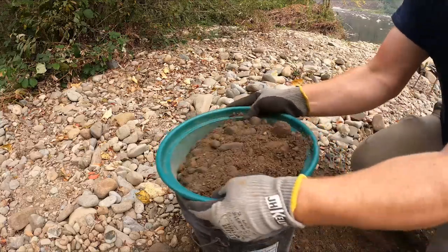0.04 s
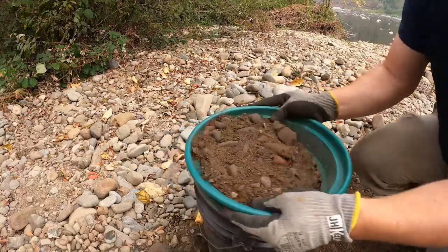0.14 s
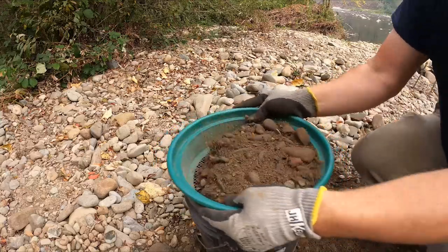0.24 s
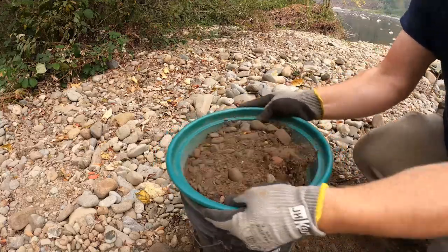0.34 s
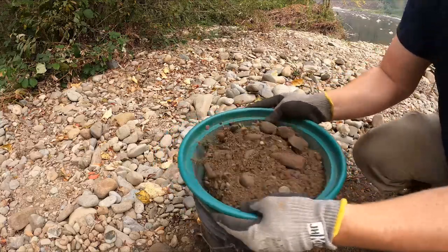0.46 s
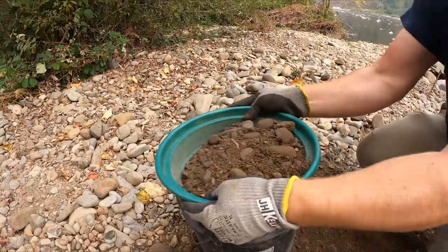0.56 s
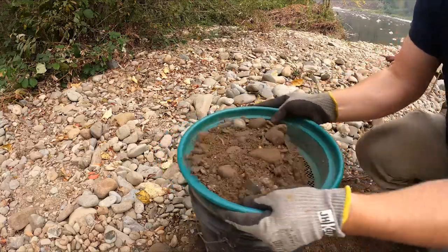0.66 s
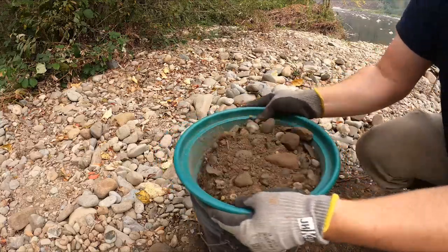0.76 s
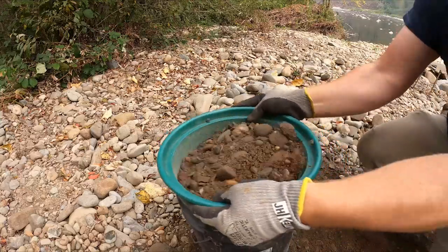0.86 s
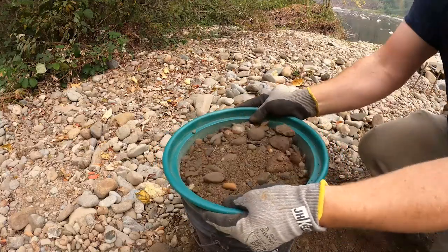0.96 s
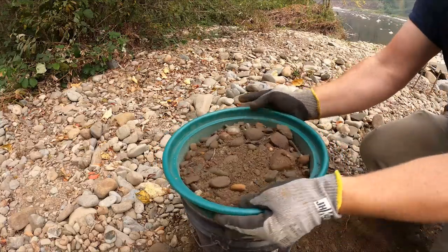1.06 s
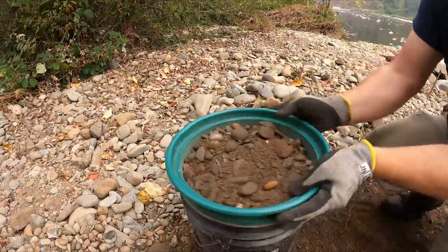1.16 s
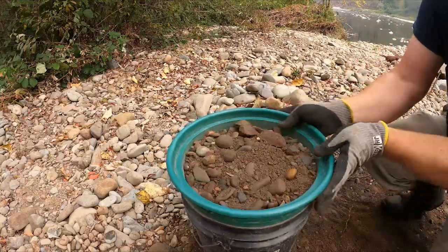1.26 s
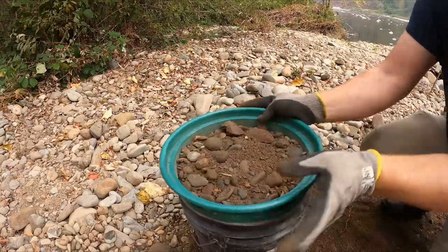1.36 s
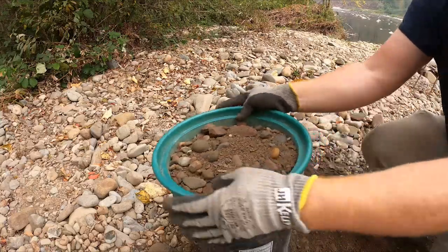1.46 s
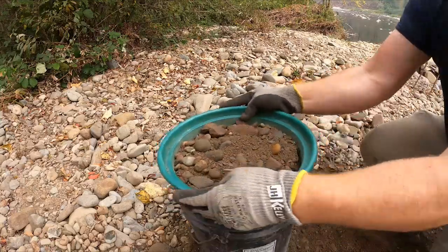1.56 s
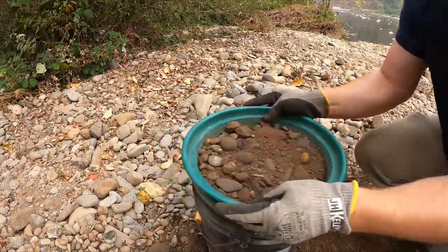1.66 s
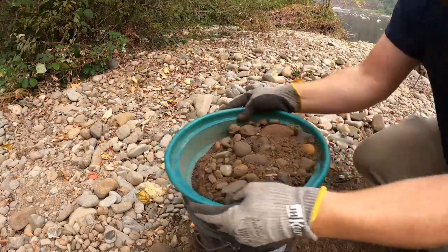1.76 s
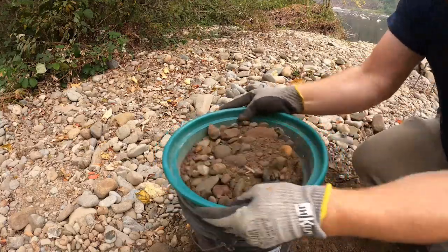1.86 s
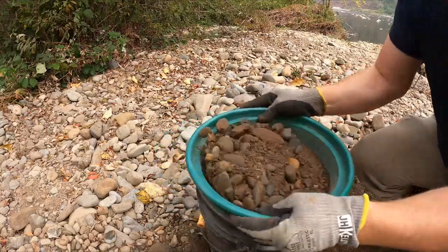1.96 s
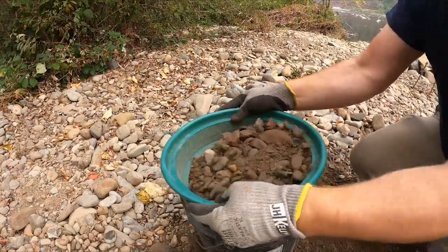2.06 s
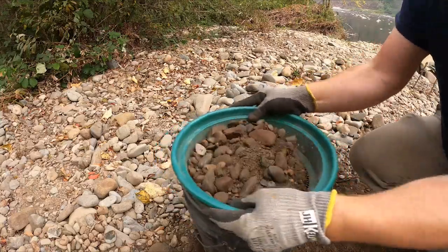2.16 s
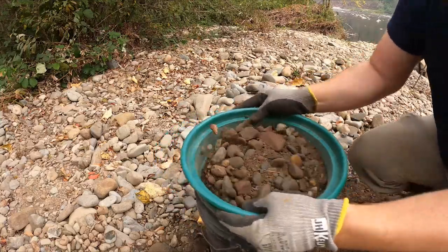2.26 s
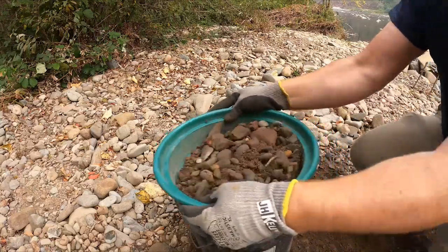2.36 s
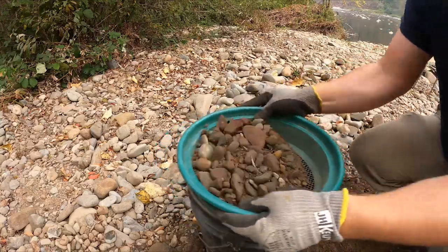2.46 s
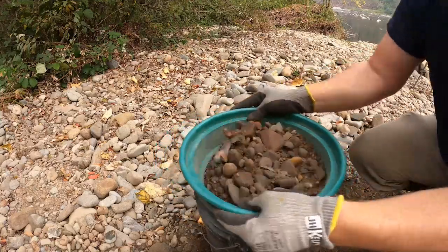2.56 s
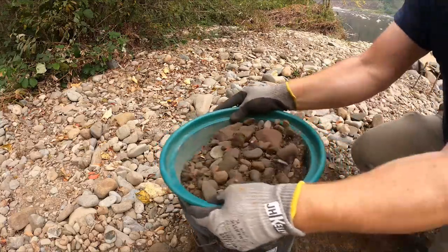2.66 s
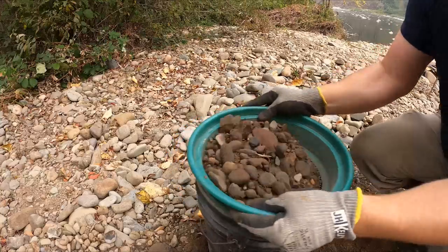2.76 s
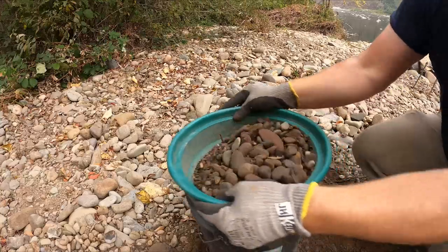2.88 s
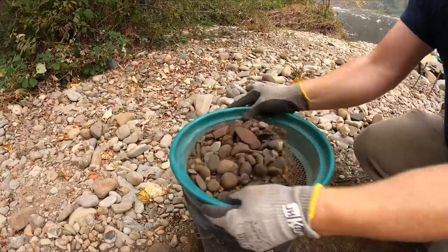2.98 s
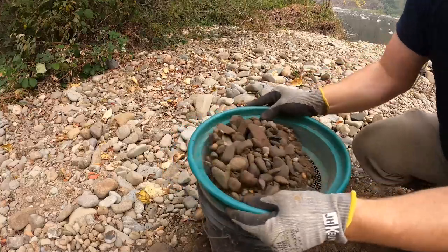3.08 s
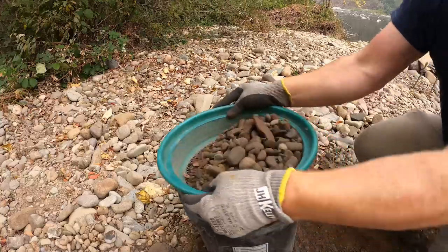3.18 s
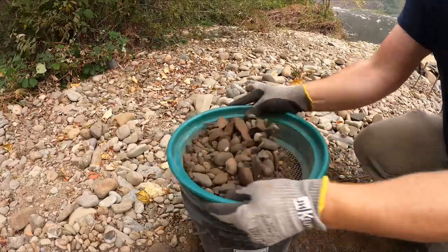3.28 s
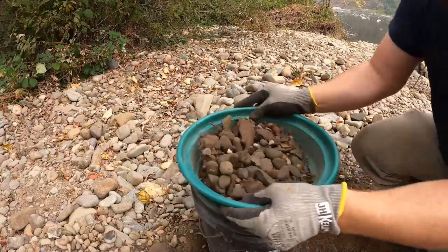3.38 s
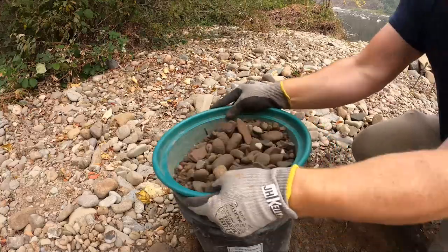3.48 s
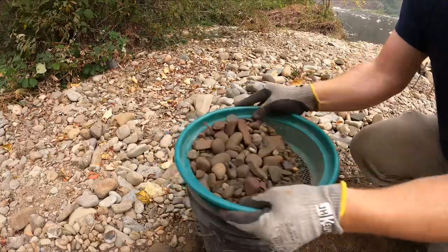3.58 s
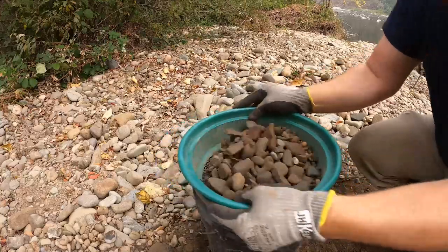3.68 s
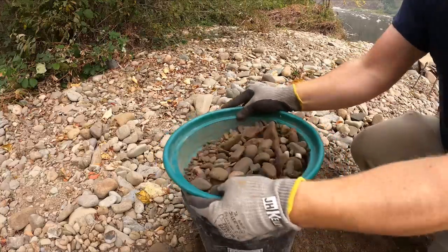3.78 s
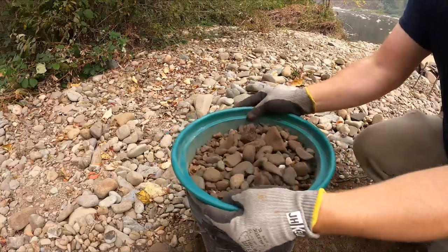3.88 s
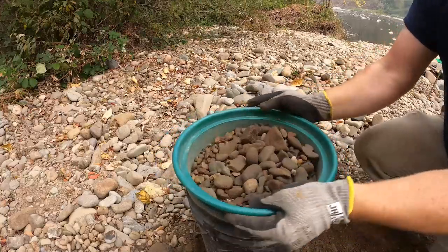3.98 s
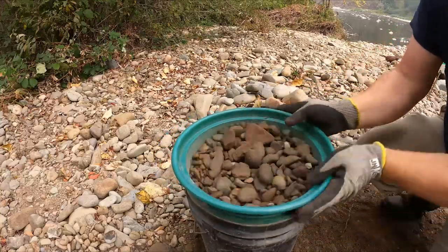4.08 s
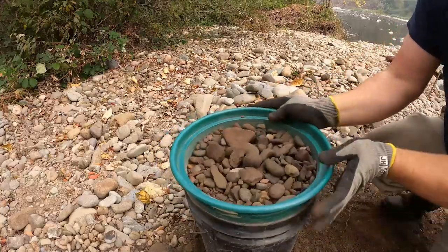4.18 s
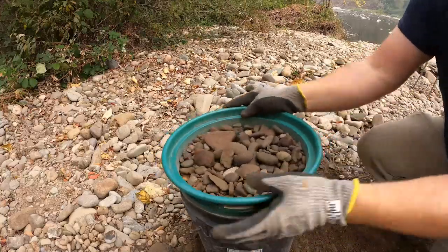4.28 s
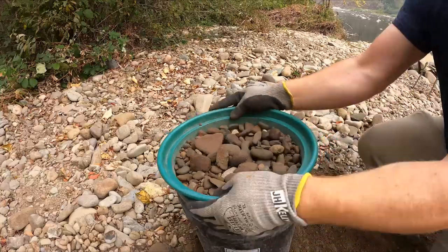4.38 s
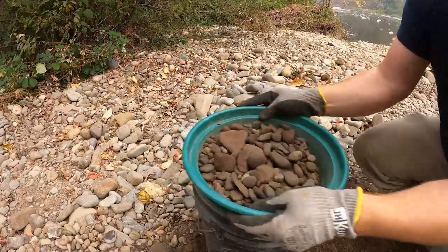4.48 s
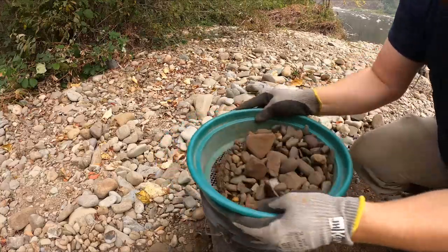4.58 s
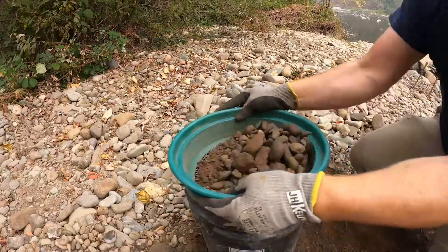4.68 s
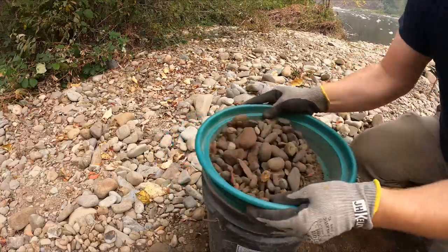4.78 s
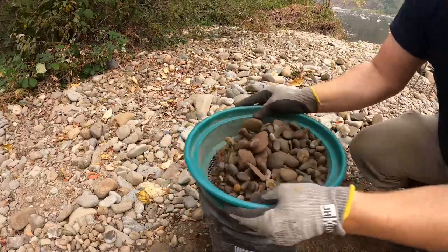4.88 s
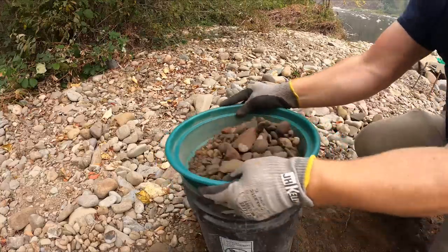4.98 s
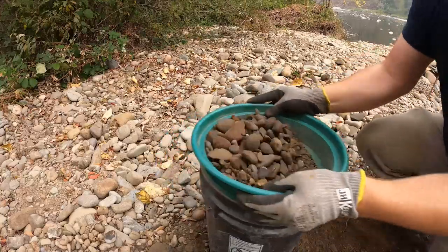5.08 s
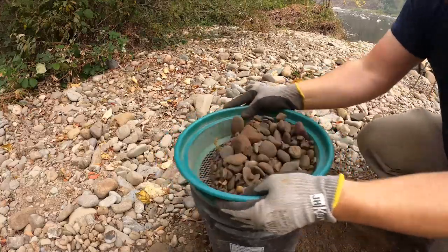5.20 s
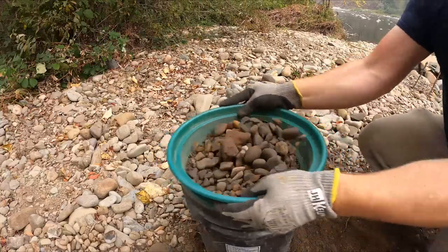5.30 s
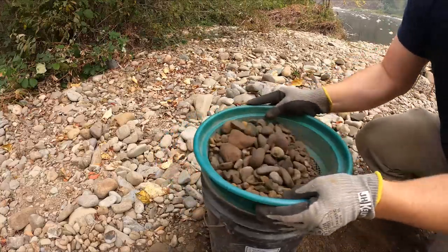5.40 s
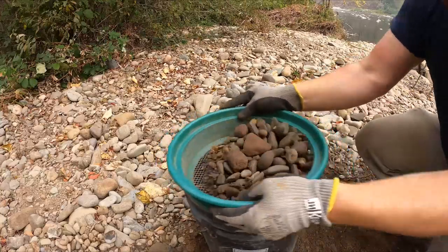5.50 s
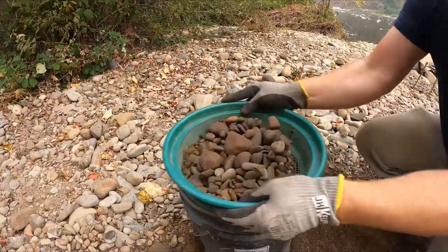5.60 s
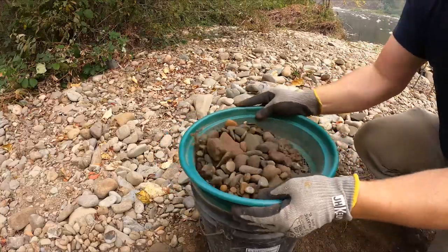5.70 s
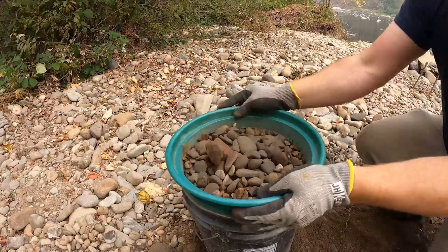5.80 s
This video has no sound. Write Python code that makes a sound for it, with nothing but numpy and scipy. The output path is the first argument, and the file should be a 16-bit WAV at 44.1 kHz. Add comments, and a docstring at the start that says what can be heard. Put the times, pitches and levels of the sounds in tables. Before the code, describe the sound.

Outdoors, close to the microphone, dry gravel is shaken in a plastic mesh sieve over a bucket. Quick to-and-fro strokes, about seven a second, make a dense rattle of pebbles, crackling grit and low bucket thuds. After about a second it stops for a dull gritty scrape as the sieve is turned, then resumes, pauses once more past four seconds, and continues to the end over a faint river wash.

```python
"""Dry river gravel is shaken to and fro in a plastic sieve on a bucket, outdoors and close to the microphone.
Each stroke is many tiny ringing contacts of pebbles and grit, with big pebbles landing and bucket thuds.
After about a second the shaking stops and the sieve is turned: dense dull grains scrape on the sandy rim.
Shaking returns for over two seconds, pauses for a second turn near 4.2 s, then goes on to the end.
Under it all lies filtered noise: a faint, slowly swelling wash of river and open air."""
import sys
import numpy as np
from scipy import signal
from scipy.fft import rfft, irfft
from scipy.io import wavfile

SR = 44100
rng = np.random.default_rng(int(sys.argv[2]) if len(sys.argv) > 2 else 0)


def to_wav(s):
    """Save 16-bit WAV."""
    ch = np.atleast_2d(s).T  # columns
    pcm = np.round(np.clip(ch, -1, 1) * 32767)  # PCM
    wavfile.write(sys.argv[1], SR, pcm.astype(np.int16))


N = 257841
TIME = np.arange(N) / SR

# shakes of the sieve: (time at mid-slide [s], relative level [dB], half the slide length [s],
# grit relative to that level [dB])
STROKES = [(0.08, -25, 0.059, -29), (0.22, -23.5, 0.036, -23), (0.365, -23.5, 0.057, -25.5),
           (0.481, -27, 0.027, -22), (0.613, -22.5, 0.019, -29.5), (0.75, -23, 0.031, -27.5),
           (0.888, -27, 0.027, -25.5), (1.035, -28.5, 0.039, -22.5), (1.748, -30.5, 0.033, -33),
           (1.855, -23.5, 0.042, -31), (2.008, -24.5, 0.056, -20), (2.156, -23.5, 0.044, -29.5),
           (2.268, -22, 0.015, -22.5), (2.414, -24.5, 0.053, -30), (2.539, -22.5, 0.019, -24.5),
           (2.724, -25, 0.055, -26), (2.83, -24.5, 0.024, -19), (2.985, -24, 0.048, -25),
           (3.12, -23.5, 0.028, -19.5), (3.285, -23, 0.056, -21), (3.393, -19.5, 0.022, -32),
           (3.568, -23.5, 0.064, -39), (3.673, -25.5, 0.031, -18), (3.833, -21.5, 0.049, -31),
           (3.969, -34, 0.039, -15), (4.593, -27, 0.037, -25), (4.705, -23.5, 0.033, -27.5),
           (4.889, -26.5, 0.06, -18.5), (5.014, -23, 0.051, -26.5), (5.157, -22, 0.028, -18),
           (5.325, -24, 0.057, -20.5), (5.467, -26, 0.057, -19), (5.618, -25, 0.051, -18),
           (5.75, -23, 0.05, -21)]
# colour of pebbles landing on the mesh: (frequency [Hz], relative level [dB])
PEBBLE = [(30, -52), (200, -9.5), (450, -11.5), (800, -5), (1020, -1.5), (1300, -3), (1560, 2), (2100, -7),
          (3200, -2.5), (5000, -10.5), (7000, -22), (8000, -15), (11000, -32), (16000, -66)]
# colour of stone clicking on stone: (frequency [Hz], relative level [dB])
FLINT = [(30, -93), (700, -37), (1500, -10.5), (2500, -3), (3600, -11.5), (5100, -8), (7000, -16),
         (8000, -36), (11000, -27), (16000, -39)]
# colour of the plastic rim and wall: (frequency [Hz], relative level [dB])
RIM = [(30, -58), (160, -24), (260, -9.5), (520, -2), (750, 0.5), (1000, 0.5), (1600, 4.5), (2400, -5),
       (3600, -14), (5200, -17.5), (7000, -30), (10000, -34), (16000, -69)]


def gravel(pebble_gain, grit_gain):
    """Pebbles knock on the mesh and click on each other, more often the harder they go; grit crackles through."""
    # colour of the grit: (frequency [Hz], relative level [dB])
    grit_colour = [(30, -60), (1500, -9), (3000, -2), (5000, 0), (7000, -8), (8000, -4), (9800, -10),
                   (11000, -18), (13000, -25), (15500, -40)]
    # colour of small hopping chips: (frequency [Hz], relative level [dB])
    chip_colour = [(30, -60), (1500, -30), (5000, 20), (8500, -16), (11000, -22), (15500, -10)]
    busy = np.clip(pebble_gain / undb(-23.0), .3, 1)
    knocks = rattle(PEBBLE, busy, per_s=1200, spread_db=3, ring_hz=1500, ring_db=6, octaves=.55)
    clicks = rattle(FLINT, busy, per_s=1700, spread_db=5, ring_hz=3200, ring_db=8, octaves=.75)
    grit = rattle(grit_colour, busy ** .5, per_s=3200, spread_db=4.5, ring_hz=6000, ring_db=4, octaves=.7)
    # a few small chips keep hopping on their own, between strokes too
    chips = rattle(chip_colour, busy ** .5, per_s=45, spread_db=4, ring_hz=7500, ring_db=5, octaves=.7)
    # stones tumble in clumps, with brief lulls between them
    clumps = undb(1.6 * walk(65))
    click_gain = np.sqrt(pebble_gain * grit_gain)
    stones = undb(1.5) * pebble_gain * knocks + undb(10.5) * click_gain * clicks
    tumbling = clumps * (stones + undb(13) * grit_gain * grit)
    return tumbling + undb(-31.5) * np.sqrt(grit_gain) * chips


def load_motion():
    """Loudness of the pebbles and of the grit: the strokes add up over a faint creep of the load."""
    creep_db, creep_grit_db = -43.5, -82.5  # the load is never quite still
    grit_lead_s = 0.0022  # grit slides before the pebbles
    pebbles, grit = undb(creep_db) ** 2, undb(creep_grit_db) ** 2
    for s, db, half_s, grit_db in STROKES:
        power = undb(db) ** 2 * surge(s, half_s)
        pebbles = pebbles + power
        grit = grit + undb(grit_db) ** 2 * power
    early_grit = np.interp(TIME + grit_lead_s, TIME, grit)
    return np.sqrt(pebbles), np.sqrt(early_grit)


def surge(s, half_s):
    """Power of one stroke: the load breaks loose, slides steadily and stops, while a share of it rolls on."""
    abruptness = 3.2  # how suddenly the load breaks loose and stops (2 = a soft bell)
    roll_db, roll_s = -5.5, 0.11  # some stones roll on after each slide and die away
    rolling = np.clip(undb(roll_db) ** 2, 0, 1) * (TIME > s)
    away = np.abs(TIME - s)
    slide = np.exp(-2 * np.minimum(away / half_s, 2) ** abruptness) * (away < 2 * half_s)
    return (1 - rolling) * slide + rolling * np.exp(-2 * away / roll_s)


def clacks():
    """Big pebbles land singly: a light graze, a few milliseconds of ring, and a hard click as they tip over."""
    # the loudest single pebbles: (time [s], relative peak [dB], ring pitch [Hz])
    landings = [(0.0546, -15, 1580), (0.1104, -8.5, 1190), (0.193, -10.5, 1530), (0.2474, -9, 1480),
                (0.4769, -3.5, 2070), (0.8997, -9, 1570), (1.0353, -8, 2080), (1.076, -8.5, 1610),
                (1.1518, -12, 3500), (1.1622, -10.5, 1660), (1.1972, -10.5, 1670), (1.27, -22, 1690),
                (1.852, -13, 1310), (1.8709, -12, 1340), (2.0473, -16, 1890), (2.123, -11, 1360),
                (2.1917, -5.5, 1350), (2.2132, -10, 1330), (2.3381, -9.5, 1510), (2.3725, -12, 1330),
                (2.5857, -9, 1450), (3.0923, -7, 2980), (3.1592, -9, 1370), (3.315, -7.5, 1470),
                (3.3433, -11, 1390), (3.4868, -9, 1470), (3.6467, -4.5, 3670), (3.6938, -10, 1640),
                (4.421, -15, 1540), (4.4374, -15.5, 2020), (4.7046, -10, 1480), (4.8383, -13, 1290),
                (4.9022, -15, 1530), (4.9504, -5.5, 1250), (5.6816, -5, 1800)]
    graze_db, graze_s = -11, .003  # each grazes its neighbours at most this long before it lands
    out = np.zeros((2, N))
    for s, db, hz in list(landings) + thrown_pebbles():
        ring = stone(PEBBLE, ripple_db=2, ring_hz=hz, ring_db=14, ring_width=.22, chatter=.7)
        click = stone(FLINT, ripple_db=3, ring_hz=hz, ring_db=10, chatter=.7)
        graze = stone(PEBBLE, ripple_db=3, ring_hz=hz, ring_db=6)
        # low-pitched blows land on the mesh, high-pitched ones on other stones
        hard = np.clip(.36 * hz / 1500, 0, .7)
        strength = undb(db) / np.abs(ring).max()
        add(out, s - graze_s * rng.uniform(0.544, 1), strength * undb(graze_db) * graze)
        add(out, s, strength * np.sqrt(1 - hard ** 2) * ring)
        add(out, s + .0008, strength * hard * click)
    return undb(2) * out


def thrown_pebbles(count=2):
    """Big pebbles that each stroke throws at random: rows (time [s], relative peak [dB], ring pitch [Hz])."""
    level_db, spread_db = 2, 5  # peak relative to the stroke
    middle_hz, spread_octaves = 1475, 0.18
    longest_flight_s = .08  # counted from mid-slide
    s, db, _, _ = np.repeat(STROKES, count, axis=0).T
    flight = longest_flight_s * rng.random(len(s))
    force, pitch = np.clip(rng.standard_normal((len(s), 2)), -2, 2).T
    peak_db = db + level_db + spread_db * force
    ring_hz = middle_hz * 2 ** (spread_octaves * pitch)
    return list(zip(s + flight, peak_db, ring_hz))


def scrape():
    """Sand is ground between sieve and rim: dense dull grains that catch and slip, brighter in a fast turn."""
    # pushes that turn the sieve: (time at the fastest [s], relative level [dB], rise [s], fall [s])
    pushes = [(1.317, -29, 0.067, 0.097), (1.56, -37.5, 0.18, 0.062), (4.16, -29.5, 0.073, 0.18),
              (4.248, -32.5, 0.034, 0.059), (4.385, -31.5, 0.062, 0.1)]
    treble_db = 10.5  # the treble lift at the fastest moment
    grains = rattle(RIM, np.ones(N), per_s=2400, spread_db=4, ring_hz=1500, ring_db=4, octaves=1.3)
    treble = signal.sosfiltfilt(signal.butter(2, 3000, "high", fs=SR, output="sos"), grains)
    catching = undb(1.5 * walk(70))
    gain = np.sqrt(sum((undb(db) * swell(s, rise, fall)) ** 2 for s, db, rise, fall in pushes))
    speed = np.sqrt(gain / gain.max())
    brighter = grains + (undb(treble_db * speed) - 1) * treble
    return undb(3) * catching * gain * brighter


def swell(s, rise, fall):
    """A smooth rise to 1 at time s and a smooth fall."""
    return np.exp(-((TIME - s) / np.where(TIME < s, rise, fall)) ** 2)


def bucket(pebble_gain):
    """The load drums on the bucket; each bump is a damped thud with a plastic knock, and wakes the air inside."""
    # the hardest bumps of sieve on bucket: (time [s], relative peak [dB], pitch [Hz])
    bumps = [(0.112, -24, 304), (0.505, -25.5, 154), (0.772, -19.5, 208), (0.903, -26, 134),
             (1.521, -28, 343), (2.006, -19.5, 273), (2.556, -19.5, 198), (2.714, -25.5, 174),
             (2.842, -23.5, 163), (2.869, -26.5, 79), (3.116, -22, 167), (3.148, -22, 125),
             (3.166, -18, 73.6), (3.391, -15, 296), (3.427, -18.5, 128), (3.44, -17.5, 88),
             (3.68, -23.5, 151), (4.439, -26, 268), (4.603, -23.5, 218), (4.862, -15.5, 257),
             (4.953, -26, 248), (5.134, -22.5, 258), (5.164, -20.5, 215), (5.405, -21.5, 364),
             (5.725, -25, 261)]
    # colour of the drumming bucket: (frequency [Hz], relative level [dB])
    bucket_colour = [(20, -14), (40, -2.5), (65, 2), (81, -15.5), (100, 0), (140, -7.5), (230, -9.5),
                     (330, -13.5), (700, -52.5)]
    drumming = coloured(rng.standard_normal(N) * pebble_gain ** 0.72, bucket_colour)
    out = undb(-19.5) * drumming * np.ones((2, 1))
    t = np.arange(-SR // 40, SR // 6) / SR
    cycles = 1.24  # time from first touch to the crest, in periods of the pitch
    for s, db, hz in list(bumps) + nudges():
        age = np.maximum(1 + t * hz / cycles, 1e-6)
        # the highs arrive first and the lows linger
        swing = np.cos(2 * np.pi * (cycles * np.log(age) + rng.random()))
        thud = (age * np.exp(1 - age)) ** 5 * swing
        air = np.sin(2 * np.pi * 82 * t) * np.exp(-np.abs(t) / 0.14) * (t > 0)
        add(out, s + t[0], undb(db) * (undb(3.07) * thud + undb(-19.0) * air))
        # the quicker the bump, the more the wall knocks
        knock = stone(RIM, ripple_db=2.0, ring_hz=540, ring_db=10, ring_width=0.74)
        add(out, s - .003, undb(db + 14.5) * hz / 250 * knock)
    return out


def nudges():
    """Late in each slide the load meets the wall: rows (time [s], relative peak [dB], pitch [Hz])."""
    level_db, middle_hz, spread_octaves = -8.5, 187, 0.23  # peak relative to the stroke
    share = .6  # how far through the second half of the slide it comes
    s, db, half_s, _ = np.transpose(STROKES)
    pitch = rng.uniform(-1.1, 1, len(s))
    return list(zip(s + share * half_s, db + level_db, middle_hz * 2 ** (spread_octaves * pitch)))


def scatter(x, t60_s, db):
    """Short diffuse reflections from the sieve wall, the bucket and the stony ground."""
    t = np.arange(SR // 6) / SR
    tail = rng.standard_normal((2, len(t))) * undb(-60 * t / t60_s) * (1 - np.exp(-t / 0.011))
    tail /= np.sqrt(np.sum(tail ** 2) / 2)
    return x + undb(db) * signal.fftconvolve(x, tail, axes=1)[:, :N]


def outdoors():
    """A faint, slowly swelling wash of river and open air, made of filtered noise."""
    # colour of river and air: (frequency [Hz], relative level [dB])
    air_colour = [(20, -3), (60, -25), (80, 15), (120, -11), (300, -7), (1000, -0.5), (3000, -7.5),
                  (8000, -24), (16000, -43)]
    mid, side = coloured(rng.standard_normal((2, N)), air_colour)
    swell_db = walk(2.08)
    return undb(-40 + swell_db) * (mid + undb(-16.5) * side * np.array([[1], [-1]]))


def rattle(points, busy, per_s, spread_db, ring_hz, ring_db, octaves, count=160, size=20000):
    """Random contacts of many stones, rms near 1; busy (0-1) is the share of the top rate per_s."""
    pitches = ring_hz * 2 ** (octaves * rng.uniform(-0.79, 1, count))
    stones = [stone(points, 2.47, hz, ring_db) for hz in pitches]
    when, chance, which = rng.random((size, 3)).T
    force = unit(undb(spread_db * np.clip(rng.standard_normal(size), -2, 2)))
    rate = np.minimum(per_s * np.interp(when * N / SR, TIME, busy), size * SR / N)
    out = np.zeros((2, N))
    # of all the possible contacts, keep as many as the rate asks for
    for k in np.flatnonzero(chance < rate * N / SR / size):
        one = stones[int(which[k] * count)]
        # rarer contacts are made stronger, so the rms holds
        add(out, when[k] * N / SR, one * force[k] * np.sqrt(SR / rate[k]))
    return out


def stone(points, ripple_db, ring_hz, ring_db, ring_width=.18, chatter=0.55, size=512, count=26):
    """One contact in stereo, with unit energy: the common colour plus this stone's own resonances."""
    port_lag_s, lag_scatter_s = 4.2e-5, 2.0e-5  # the right mostly hears first; stones lie all over the sieve
    hz = np.fft.rfftfreq(size, 1 / SR)
    knots = np.linspace(0, np.sqrt(SR / 2), count)
    own = np.interp(np.sqrt(hz), knots, rng.standard_normal(count))
    ring = 1 / (1 + ((hz / ring_hz - 1) / ring_width) ** 2)
    cepstrum = irfft(np.log(undb(colour_db(points, hz) + ripple_db * own + ring_db * ring)))
    # minimum phase: a sharp start, then the resonances die away
    spectrum = np.exp(rfft(np.r_[0, 2 * cepstrum[1:size // 2]], size)) * rng.choice([-1, 1])
    # a rough stone grazes lightly about one ring cycle before it lands
    cycle_s = (1 + 0.19 * rng.standard_normal()) / ring_hz
    spectrum = spectrum * (chatter + np.exp(-2j * np.pi * hz * cycle_s))
    place, side = rng.standard_normal(2)
    ports = np.array([[.5], [-.5]])  # left, right
    lag = 8 / SR + ports * (port_lag_s + lag_scatter_s * place)
    right_db = 1.0 + 0.4 * side + 4 * hz / 16000  # how much louder the right is
    click = irfft(spectrum * undb(-ports * right_db) * np.exp(-2j * np.pi * hz * lag))
    return click / np.sqrt(np.sum(click ** 2) / 2)


def walk(per_s):
    """Random levels joined by straight lines, spread near 1."""
    return 1.2 * np.interp(TIME * per_s, np.arange(1000), rng.standard_normal(1000))


def coloured(x, points):
    """Filter by a spectrum, keeping the power of white noise."""
    gain = undb(colour_db(points, np.fft.rfftfreq(N, 1 / SR)))
    return irfft(rfft(x) * unit(gain), N)


def colour_db(points, hz):
    """Read a spectrum on a log-frequency axis."""
    knots, db = np.transpose(points)
    return np.interp(np.log(hz + 1), np.log(knots), db)


def undb(db):
    """Decibels to gain."""
    return 10 ** (np.asarray(db) / 20)


def unit(x):
    """Scale to rms 1."""
    return x / np.sqrt(np.mean(x ** 2))


def add(out, start_s, sound):
    """Mix a short sound into out."""
    i = max(int(start_s * SR), 0)
    part = out[:, i:i + sound.shape[-1]]
    part += sound[..., :part.shape[1]]


def scene():
    """Gravel, sieve and bucket on an open river bank."""
    pebble_gain, grit_gain = load_motion()
    sieve = gravel(pebble_gain, grit_gain) + clacks() + scrape() + bucket(pebble_gain)
    return scatter(sieve, t60_s=0.024, db=-12.5) + outdoors()


def record(dry):
    """A steep low-pass filter cuts the top of the treble."""
    top_hz = 15400
    return signal.sosfilt(signal.ellip(10, .2, 80, top_hz, fs=SR, output="sos"), dry)


dry = scene()
out = record(dry)
to_wav(out)
```